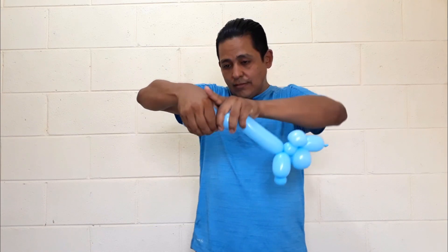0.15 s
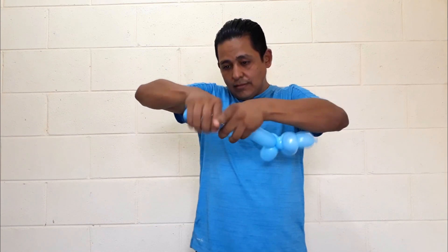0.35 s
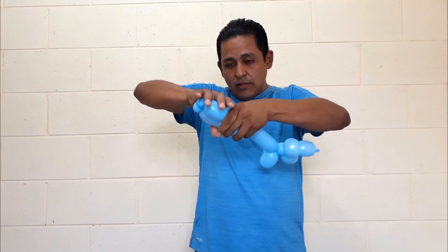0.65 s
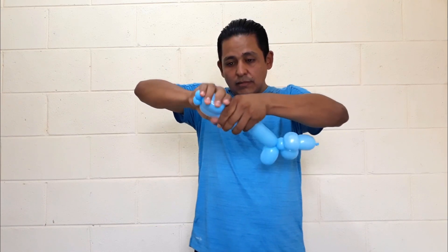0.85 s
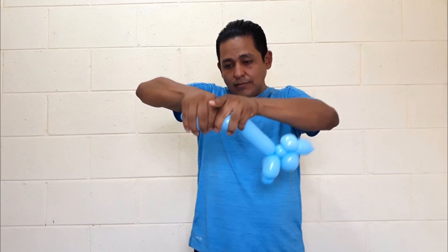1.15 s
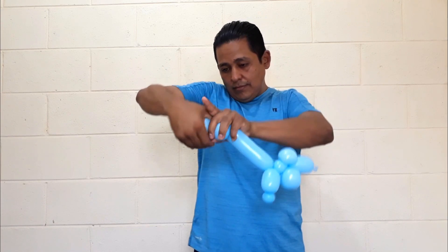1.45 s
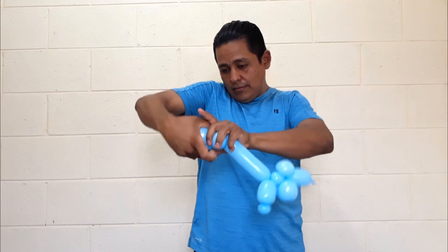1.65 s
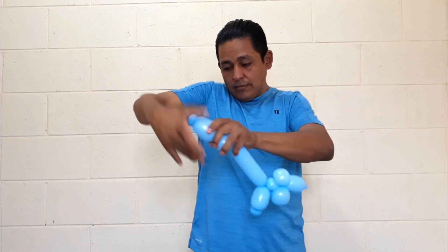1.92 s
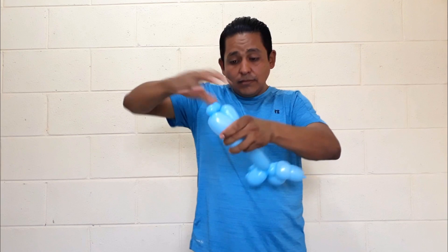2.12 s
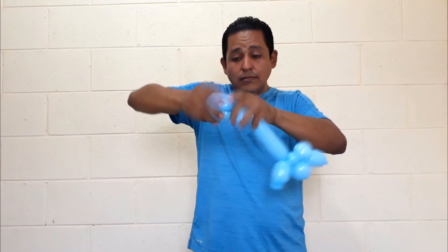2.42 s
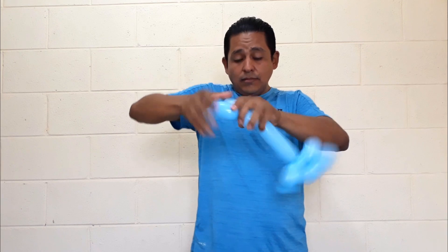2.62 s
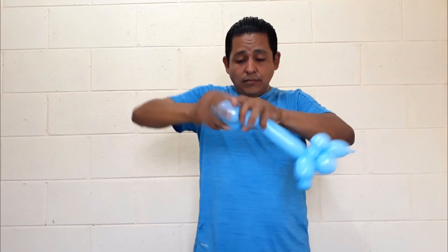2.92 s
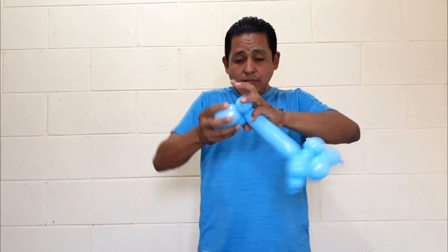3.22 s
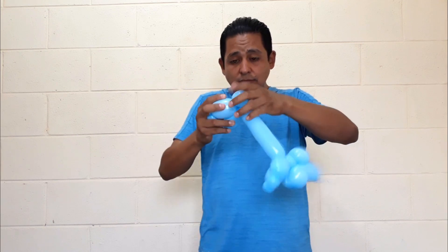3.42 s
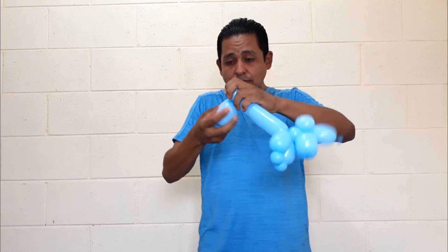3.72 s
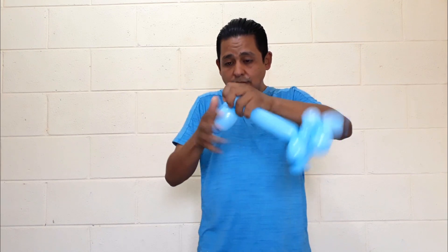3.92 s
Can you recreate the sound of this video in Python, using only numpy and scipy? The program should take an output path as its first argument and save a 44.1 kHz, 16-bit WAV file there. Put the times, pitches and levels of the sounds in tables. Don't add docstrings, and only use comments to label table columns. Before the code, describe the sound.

Fingers rub and twist a thin inflated latex balloon. Short gritty scrapes and small ticks come first, then a low squeak near half a second, brief tight creaks, a sharp snap and high squeak just before two seconds, and clusters of strong snaps around three seconds. A small bare room gives each burst a short, bright echo; the microphone also picks up quiet air hush and faint traffic rumble.

```python
import sys
import numpy as np
from scipy import signal
from scipy.io import wavfile

SR = 44100
rng = np.random.default_rng(int(sys.argv[2]) if len(sys.argv) > 2 else 0)


def persist_wave(psi):
    counts = np.round(np.clip(psi, -1, 1) * 32767).astype(np.int16)
    wavfile.write(sys.argv[1], SR, np.atleast_2d(counts).T)


def field_ratio(decibels):
    return 10 ** (np.asarray(decibels, dtype=float) / 20)


N = 179310


def at_hz(points, hz, axis=1):
    table = np.array(points)
    return np.interp(np.log(hz), np.log(table[:, 0]), table[:, axis])


def resonance(x, hz, width_hz):
    r = np.exp(-np.pi * width_hz / SR)
    top = (1 - r * r) / 2
    return signal.lfilter([top, 0, -top], [1, -2 * r * np.cos(2 * np.pi * hz / SR), r * r], x)


def butter(x, hz, kind, order=2):
    return signal.sosfilt(signal.butter(order, hz, kind, fs=SR, output="sos"), x)


def noise_bands(size):
    white = rng.standard_normal((2, size))
    edges = 25 * 2 ** np.arange(0, 9.6, .5)
    return [(np.sqrt(low * high), butter(white[k % 2], [low, high], "band"))
            for k, (low, high) in enumerate(zip(edges, edges[1:]))]


# (pitch_hz [Hz], level_db [dB per Hz])
HUSH_COLOUR = [(25, -46.5), (60, -14), (200, -14), (450, -16), (1300, -24.5), (3150, -24), (6000, -42),
               (15000, -27)]
HUSH_DB = -62.5


def still_air():
    hush = sum(field_ratio(at_hz(HUSH_COLOUR, hz)) * band for hz, band in noise_bands(N + SR))[SR:]
    return field_ratio(HUSH_DB) * hush / hush.std()


# (start_s [s], level_db [dB])
TRAFFIC = [(0.0, -81), (0.18, -96), (0.35, -86), (0.49, -70), (1.39, -84), (1.94, -66.5), (2.179, -73),
           (2.33, -86), (2.58, -84), (2.71, -73), (3.22, -71.5), (4.06, -67.5)]


def far_traffic():
    hum_hz, width_hz = 72, 18.0
    rumble = rng.standard_normal(N + SR)
    rumble = resonance(resonance(rumble, hum_hz, width_hz), hum_hz, width_hz)[SR:]
    rumble = rumble / np.abs(signal.hilbert(rumble)) ** .7
    level_db = np.interp(np.arange(N) / SR, *np.transpose(TRAFFIC))
    return field_ratio(level_db) * rumble / rumble.std()


# (pitch_hz [Hz], time_to_fall_60_db_s [s], level_db [dB])
WALL_ECHO = [(200, 0.34, 3.5), (565, 0.25, -0.5), (1460, 0.3, 3), (3680, 0.28, 0.5), (9700, 0.26, -9.5),
             (15000, 0.18, -2.5)]
ECHO_DB = 4.5
FIRST_ECHO_S, BUILD_S = 0.00087, 0.0021
SHARED = 0.27
SPARSE_DB, SPARSE_S = 5, .04


def walls(events):
    t = np.arange(SR // 2) / SR
    hz, bands = zip(*noise_bands(2 * SR))
    bands = np.array(bands)
    fall_db = 60 * t / at_hz(WALL_ECHO, hz)[:, None]
    fades = field_ratio(at_hz(WALL_ECHO, hz, axis=2)[:, None] - fall_db)
    patches = butter(rng.standard_normal(2 * SR), 1860, "low")
    out = np.zeros(N + SR)
    for start_s, sound in events:
        first = rng.integers(SR // 2, SR)
        own = slice(first, first + len(t))
        echo = np.sum((bands[:, own] + SHARED * bands[:, -len(t):]) * fades, axis=0)
        echo *= field_ratio(SPARSE_DB * np.exp(-t / SPARSE_S) * patches[own] / patches.std())
        echo *= 1 - np.exp(-np.clip(t - FIRST_ECHO_S, 0, 1) / BUILD_S)
        echo *= field_ratio(ECHO_DB) / np.sqrt(np.sum(echo ** 2))
        echo[0] = 1
        heard = signal.fftconvolve(sound, echo)
        at = round(start_s * SR)
        out[at:at + len(heard)] += heard
    return out[:N]


def slips(length, per_s, uneven, swell_db, arch, glide=0):
    luck = rng.standard_normal((7, 200))
    luck[1:4, 0] = 0.56
    scatter = luck[0] - luck[0, :int(length * per_s) + 2].mean()
    gaps = np.exp(uneven * scatter) / per_s
    times = np.cumsum(gaps) - gaps[0]
    times = times + glide * .008 * (1 - np.exp(-times / .008))
    keep = times <= length
    share = np.clip(times / length, 0, 1)
    sizes = field_ratio(4 * uneven * luck[1:4] + swell_db * share)
    sizes = sizes * np.sin(np.pi * (.04 + .92 * share)) ** arch
    signs = np.where(luck[4:] * uneven > .3, -1, 1)
    at = times[keep] * SR
    trains = np.full((3, int((length + .025) * SR)), 1e-18)
    for train, size in zip(trains, (sizes * signs)[:, keep]):
        np.add.at(train, at.astype(int), size * (1 - at % 1))
        np.add.at(train, at.astype(int) + 1, size * (at % 1))
    grain = rng.standard_normal(SR // 4)[:trains.shape[1]]
    fizz = grain * butter(np.abs(trains[2]), 390, "low", order=1)
    trains[2] += 14 * uneven ** 2 * fizz
    return trains


# (start_s [s], level_db [dB])
GRIP_FREEDOM = [(0.0, -5), (0.25, -4), (0.3, -3.5), (0.65, 1), (0.95, -5.5), (1.25, -5.5), (1.49, 3),
                (1.8, 0.5), (2.24, 2.5), (2.42, -2.5), (2.58, 1), (2.86, -1), (3.05, -0.5), (3.2, 8),
                (3.41, 3.5), (3.57, 3.5), (3.77, 6.5), (3.95, 10)]


def boom_db(s, skin_hz):
    tightness_octaves = np.log2(skin_hz / 10 ** 3)
    return np.interp(s, *np.transpose(GRIP_FREEDOM)) - 10 * tightness_octaves


# (pitch_hz [Hz], width_hz [Hz], level_db [dB])
TUBE_RINGS = [
    (407.4, 422, -3),
    (533, 199, 5),
    (850, 590, -4.5),
]


def latex(length, trains, skin_db, skin_hz, tube_db, crackle_db, q=1.9, skirt_db=0):
    width_hz = skin_hz / q
    skin = resonance(resonance(trains[0], skin_hz, width_hz), skin_hz, width_hz)
    skirt = butter(trains[0], [800, 2.31 * skin_hz], "band")
    skin = butter(skin + field_ratio(skirt_db) * skirt, 933, "high")
    size = field_ratio(0.29 * np.clip(tube_db, -20, 15))
    tube = sum((-1) ** k * field_ratio(db) * resonance(trains[1], hz / size, width)
               for k, (hz, width, db) in enumerate(TUBE_RINGS))
    tube = butter(butter(tube, 300 / size, "high"), 1200, "low")
    crackle = butter(trains[2], 3500, "high")
    parts = (skin, 0), (tube, tube_db), (crackle, crackle_db)
    return sum(field_ratio(skin_db + db) * part * np.sqrt(length * SR / np.sum(part ** 2)) for part, db in parts)


def rub_slips_per_s(skin_hz):
    return 500 + .3 * skin_hz


# (start_s [s], length_s [s], skin_db [dB], skin_pitch_hz [Hz])
LIGHT_SLIDES = [(0.0, 0.0093, -50, 2290), (0.331, 0.056, -47, 2322), (0.471, 0.049, -51, 892),
                (0.941, 0.068, -54.5, 2187), (0.984, 0.05, -55, 1703), (1.051, 0.1, -63.5, 1135),
                (1.329, 0.012, -54.5, 1207), (1.55, 0.044, -52, 3305), (2.49, 0.021, -50, 2610),
                (2.949, 0.083, -60, 1210), (3.008, 0.046, -58.5, 1316), (3.199, 0.14, -48.5, 1941),
                (3.49, 0.039, -55.5, 2360), (3.685, 0.046, -53.5, 2080), (3.857, 0.046, -64.5, 1273)]
# (start_s [s], length_s [s], skin_db [dB], skin_pitch_hz [Hz], crackle_db [dB re skin])
FIRM_DRAGS = [(0.282, 0.0084, -42, 1570, -3), (0.284, 0.041, -49, 1945, -2), (0.355, 0.016, -42, 990, 3),
              (0.406, 0.016, -44.5, 1707, -4), (0.439, 0.016, -48.5, 980, -19),
              (0.601, 0.042, -42.5, 1310, 5), (1.256, 0.022, -41, 2634, 2.5),
              (1.41, 0.049, -47.5, 2506, 12), (1.485, 0.0072, -35, 1700, -18),
              (1.498, 0.021, -34, 1984, 10), (1.816, 0.036, -61.5, 1283, 26.5),
              (2.352, 0.037, -54, 2290, 8), (2.417, 0.023, -35.5, 2710, 0), (2.551, 0.035, -47.5, 952, 2.5),
              (2.791, 0.026, -53.5, 2280, 4.5), (2.847, 0.01664, -42.5, 1100, -3),
              (3.381, 0.019, -51.5, 1060, -1), (3.401, 0.014, -42.5, 928, 7),
              (3.551, 0.0081, -45.5, 1403, 9), (3.566, 0.033, -43.5, 1445, 13),
              (3.606, 0.033, -38.5, 2370, 6.5), (3.765, 0.042, -46.5, 963, -10),
              (3.933, 0.011, -49.5, 874, 2.5), (1.148, 0.013, -52.5, 760, -23)]
SLIDE_CRACKLE_DB = -3.5


def slides_and_drags():
    slides = [(*row, SLIDE_CRACKLE_DB) for row in LIGHT_SLIDES]
    for s, length, db, hz, crackle_db in list(FIRM_DRAGS) + slides:
        trains = slips(length, rub_slips_per_s(hz), uneven=.65, swell_db=-1.5, arch=0.41)
        yield s, latex(length, trains, db, hz, boom_db(s, hz), crackle_db)


# (start_s [s], length_s [s], skin_db [dB], skin_pitch_hz [Hz], crackle_db [dB re skin])
HARD_JERKS = [(0.0094, 0.0089, -46.5, 1877, 4.5), (0.046, 0.013, -50.5, 2960, 0),
              (0.086, 0.00375, -47, 2900, 2), (0.117, 0.017, -47.5, 2710, -2),
              (0.241, 0.011, -58, 1510, 9.5), (0.375, 0.0099, -45, 2030, -21),
              (0.864, 0.013, -52.5, 1158, -20), (1.152, 0.021, -51.5, 4380, 17.5),
              (1.203, 0.02, -53, 3510, -14), (1.24, 0.013, -46, 2610, 0), (1.659, 0.0054, -46, 3170, 9),
              (1.698, 0.029, -58.5, 4720, 5.5), (1.79, 0.0076, -35.5, 1340, 16),
              (1.886, 0.056, -46, 2137, -23), (2.238, 0.0053, -50.5, 1046, -8),
              (2.288, 0.012, -46, 1495, -4), (2.332, 0.0095, -43, 2114, 8.5),
              (2.414, 0.0042, -28.5, 1054, -1.5), (2.573, 0.034, -40, 936, 7.5),
              (2.776, 0.016, -52.5, 1495, -3), (2.833, 0.01237, -43.5, 1020, -2),
              (3.047, 0.024, -55.5, 993, 9), (3.08, 0.019, -40.5, 1400, -22),
              (3.394, 0.0072, -45.5, 827, -3)]


def jerks():
    for s, length, db, hz, crackle_db in HARD_JERKS:
        trains = slips(length, rub_slips_per_s(hz), uneven=.6, swell_db=-9, arch=0)
        yield s, latex(length, trains, db, hz, boom_db(s, hz), crackle_db)


# (start_s [s], length_s [s], skin_db [dB], slips_per_s [1/s], skin_pitch_hz [Hz])
SLOW_CREAKS = [
    (0.89, 0.018, -43.5, 290, 2330),
    (0.908, 0.0223, -41.5, 215, 2720),
    (1.396, 0.023, -40.5, 390, 3860),
]


def creaks():
    for s, length, db, per_s, hz in SLOW_CREAKS:
        crackle_db = 2.5 + 6 * np.log2(per_s / 300)
        trains = slips(length, per_s, uneven=0.073, swell_db=8.5, arch=0)
        yield s, latex(length, trains, db, hz, -34, crackle_db, q=1.84, skirt_db=-9)


# (start_s [s], length_s [s], skin_db [dB], pitch_hz [Hz],
# start_lag [share of the pitch by which the start lags])
FAST_SQUEAKS = [
    (0.508, 0.021, -42.5, 371.6, -0.0029),
    (1.9082, 0.021, -34.5, 1629, 0.097),
    (3.2712, 0.022, -35, 834.6, -0.045),
    (3.301, 0.0083, -61, 860, -0.041),
]
SLACK_HZ, TUBE_TOP_HZ = 1120, 1100


def squeaks():
    for s, length, db, per_s, glide in FAST_SQUEAKS:
        waver = (per_s / 5200) ** 3
        trains = slips(length, per_s, uneven=waver, swell_db=0, arch=.1, glide=glide)
        hz = max(2.14 * per_s, SLACK_HZ)
        crackle_db = 1.5 + 9.5 * np.log2(per_s / 10 ** 3)
        tube_db = boom_db(s, hz) + 3 - 12 * (per_s > TUBE_TOP_HZ)
        yield s, latex(length, trains, db, hz, tube_db, crackle_db, q=2.1, skirt_db=-9)


# (start_s [s], skin_db [dB], skin_pitch_hz [Hz], crackle_db [dB re skin])
LONE_SNAPS = [(0.5849, -36.5, 1520, 7), (0.637, -25, 755, 5.5), (1.3751, -40.5, 2200, 5),
              (1.7707, -42, 1880, 10.5), (1.7862, -12, 1230, -19), (2.868, -20, 1280, -5),
              (2.8783, -20, 1260, 0), (2.8806, -13.5, 1026, -2), (2.9093, -23, 1180, -10),
              (3.1117, -10, 1777, 0.5), (3.1201, -14.5, 2660, -25), (3.13, -25.5, 2220, -19),
              (3.1424, -45, 2200, -24), (3.156, -21.5, 1290, -37), (3.845, -53.5, 940, 17),
              (3.8541, -33, 1860, 3.5), (3.9101, -34, 2400, 0.5), (3.9347, -50, 950, -21)]
# (start_s [s], skin_db [dB], skin_pitch_hz [Hz], crackle_db [dB re skin])
RUB_TICKS = [(0.0429, -40, 3020, 11), (0.1209, -34.5, 2360, 1), (0.236, -41.5, 1570, 3),
             (0.5236, -29.5, 1180, 2), (0.6242, -26, 1400, -20), (1.1509, -31, 3740, 0),
             (1.8756, -22.5, 1120, -8), (2.577, -22, 1550, -2.5), (3.0838, -19, 1140, -6.5),
             (3.5665, -26.5, 1700, -9), (3.616, -25, 1410, 3)]
SNAP_S, SNAP_TUBE_DB = 0.0011, -3.5


def snaps():
    for s, db, hz, crackle_db in list(LONE_SNAPS) + list(RUB_TICKS):
        trains = slips(1.2 / hz, hz, uneven=.3, swell_db=-7.5, arch=0)
        yield s, latex(SNAP_S, trains, db, hz, boom_db(s, hz) + SNAP_TUBE_DB, crackle_db)


def balloon():
    for source in (slides_and_drags, jerks, creaks, squeaks, snaps):
        yield from source()


def scene():
    return (walls(balloon()) + still_air() + far_traffic())[None]


def microphone(x):
    edge_hz, flat_hz = 9000, 10740
    poles, zeros = (signal.butter(6, hz, fs=SR, output="zpk")[1] for hz in (edge_hz, flat_hz))
    gain = np.abs(np.prod(1 - poles) / np.prod(1 - zeros))
    x = signal.sosfilt(signal.zpk2sos(zeros, poles, gain), x)
    x = x + 0.1 * butter(x ** 2, 150, "low") - 0.00043
    x = 1.5 * np.tanh(x / 1.5)
    return signal.sosfilt(signal.cheby2(16, 34, 15850, fs=SR, output="sos"), x)


def roll_off(x):
    return signal.sosfilt(signal.butter(12, 16730, fs=SR, output="sos"), x)


def record(dry):
    mix = microphone(dry)
    return roll_off(mix)


dry = scene()
out = record(dry)
persist_wave(out)
```